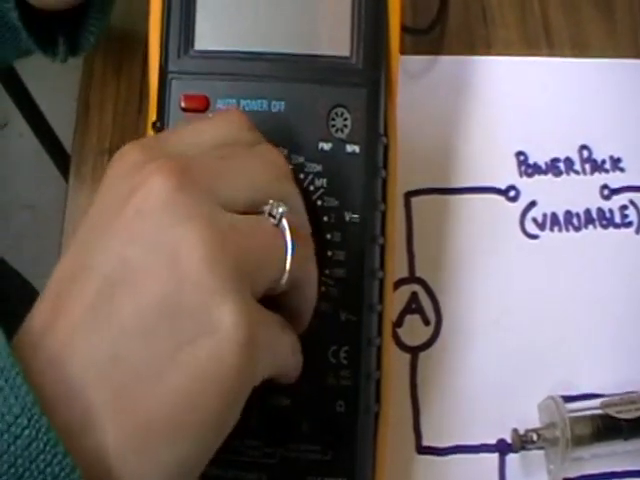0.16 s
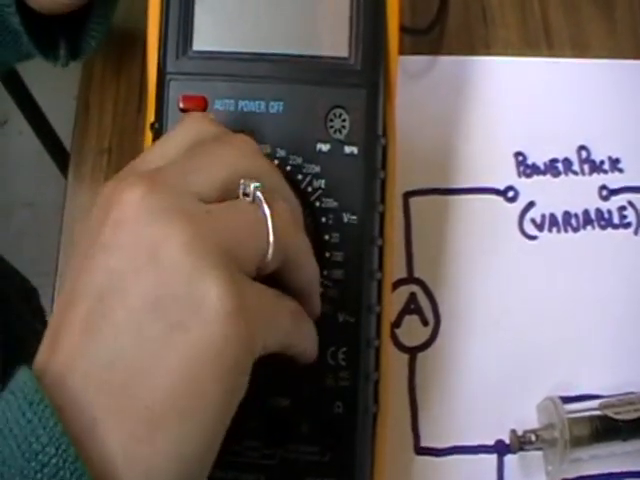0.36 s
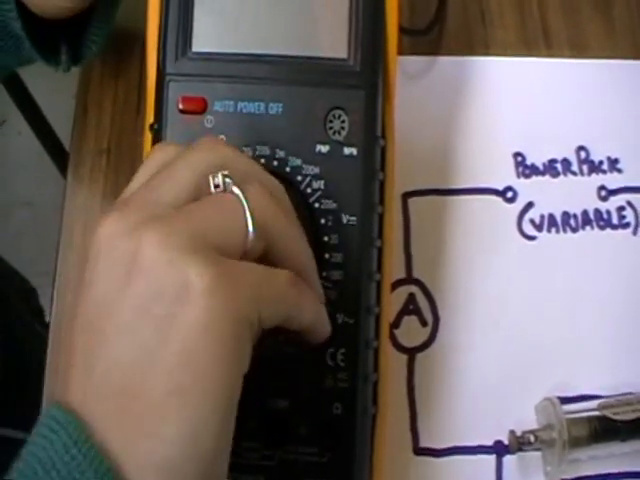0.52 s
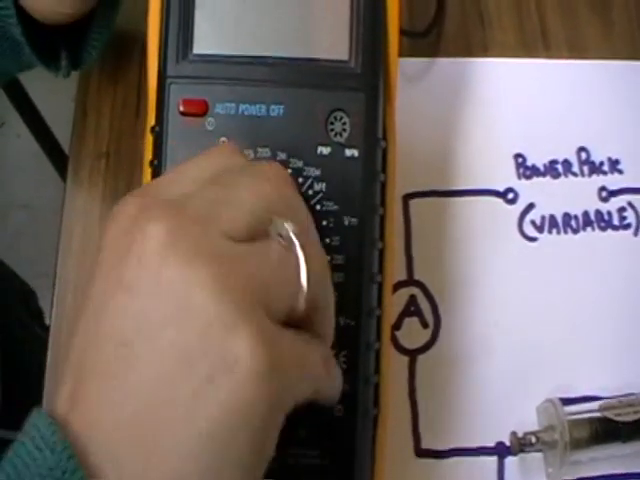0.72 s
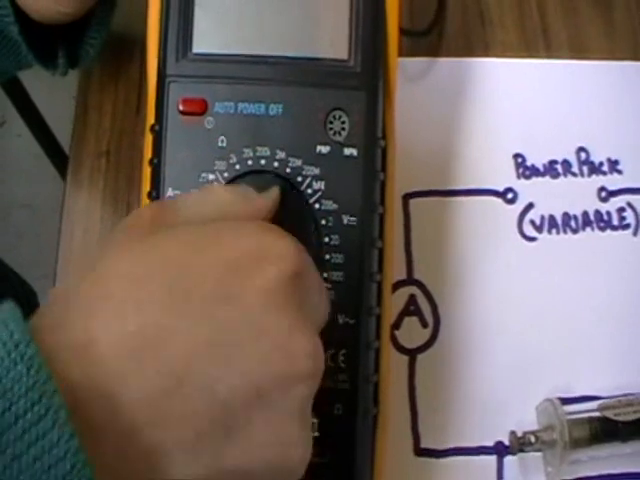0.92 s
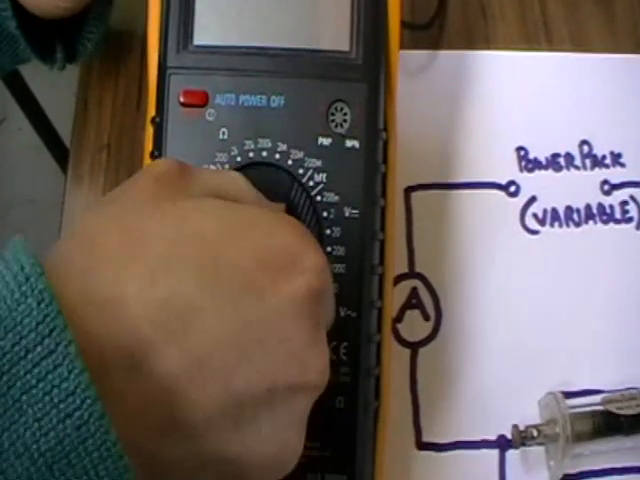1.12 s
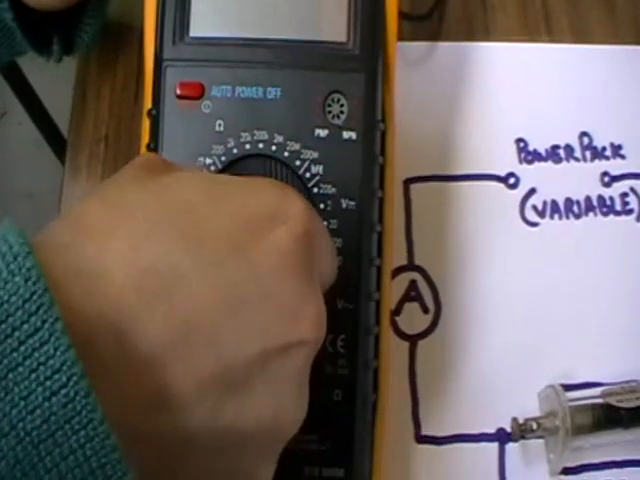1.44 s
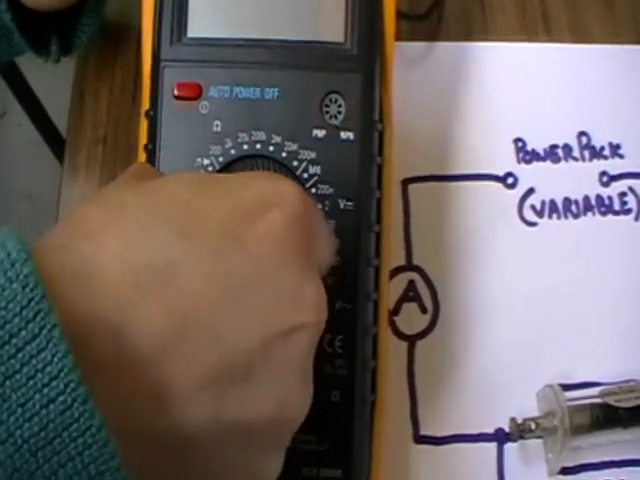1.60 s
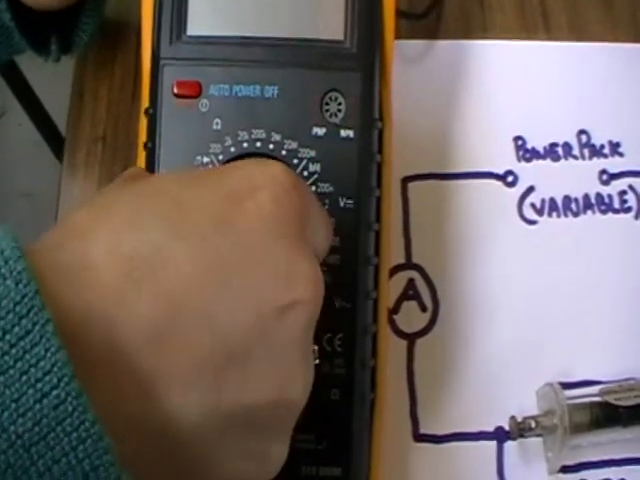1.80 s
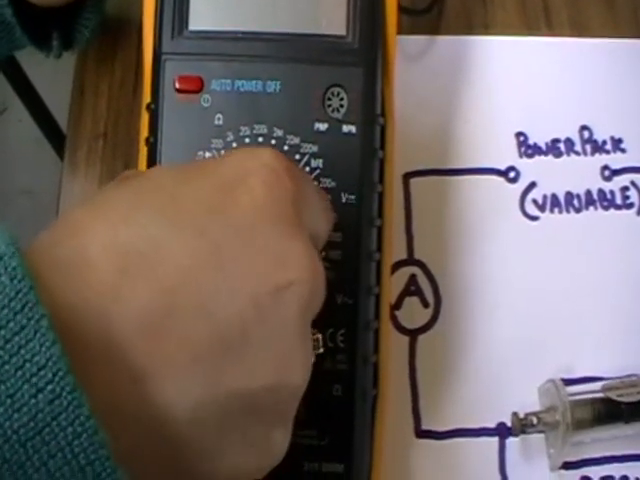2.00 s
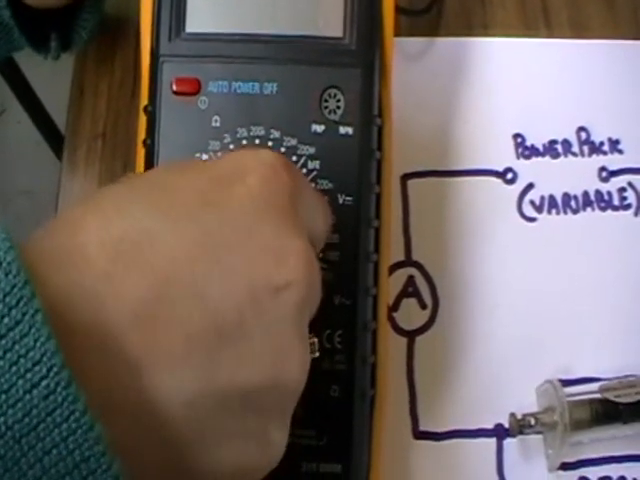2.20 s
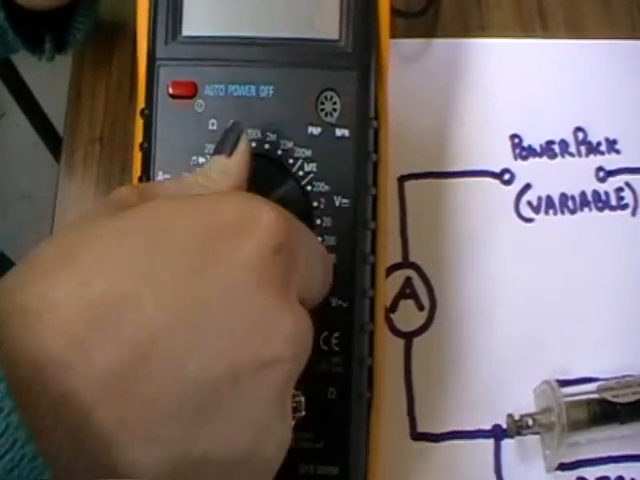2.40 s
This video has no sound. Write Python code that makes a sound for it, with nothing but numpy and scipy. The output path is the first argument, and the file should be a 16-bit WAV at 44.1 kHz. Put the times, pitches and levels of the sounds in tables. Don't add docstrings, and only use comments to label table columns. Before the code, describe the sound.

Hard clicks of a meter's dial turned by hand, with finger ticks and a brief scrape

```python
import sys
import numpy as np
from scipy import signal
from scipy.fft import rfft, irfft
from scipy.io import wavfile
from scipy.ndimage import uniform_filter1d

SR = 44100
rng = np.random.default_rng(int(sys.argv[2]) if len(sys.argv) > 2 else 0)


def wrap_up_sound(samples):
    columns = np.atleast_2d(samples).T
    tamed = np.clip(columns, -1, 1)
    steps = np.round(tamed * 32767).astype(np.int16)
    wavfile.write(sys.argv[1], SR, steps)


def ratio(d):
    e = np.asarray(d, float) / 20
    return 10 ** e


N = 112454

# f/Hz, level/dB
AIR_TONE = [(25, -29.5), (60, -13.5), (130, -10), (273, -7.5), (380, -12.5), (1400, -20.5), (5570, -30.5),
            (16500, -48.5)]
# f/Hz, level/dB
AIR_SIDE_TONE = [(50, -9), (200, -16), (2000, -10), (12000, 1.5)]
# f/Hz, width/Hz, level/dB
HUMS = [(277.8, 26, -57.5), (140.7, 8.3, -64), (509, 42, -72.5)]
# f/Hz, level/dB, time to fade by 60 dB/s
METAL_RING = [(5500, -68, .45), (10550, -72, .45)]
# f/Hz, level/dB, time to fade by 60 dB/s
ROOM_BANDS = [(250, -18.5, 0.73), (713.5, -15, .45), (1400, -19.5, 0.48), (3000, -20.5, 0.36),
              (5500, -43, 1), (9640, -38.5, 1), (14100, -27, 0.57)]
# f/Hz, difference/dB
LEFT_LEAN = [(300, 0), (1500, 2), (3000, 0.5), (5500, -1.9), (9000, -2.3), (13000, -7)]
# f/Hz, level/dB
PORT_SCATTER = [(300, -2.5), (2000, -6), (5500, -19), (9000, -9.5), (14000, -9)]
# t/s, level/dB, f/Hz, time to fade by 60 dB/s
DESK_THUDS = [(.2021, -32.5, 155, 0.056), (0.2392, -30, 146.6, 0.13), (0.4354, -30, 242, 0.033),
              (0.4594, -31, 177, 0.12), (0.6106, -40.5, 139, 0.14), (0.786, -33, 782, 0.027),
              (0.7867, -37.5, 409, 0.051), (.8141, -39, 724, .031), (0.9177, -41, 740, .041),
              (1.0207, -26, 750, 0.022), (1.0211, -38.5, 533, 0.015), (1.1146, -31, 131, 0.081),
              (1.1151, -27.5, 750, 0.028), (1.1154, -29.5, 318, 0.047), (1.3255, -30.5, 157.2, .11),
              (1.4739, -32.5, 146.6, 0.088), (1.5049, -35.5, 129, 0.1), (1.6011, -32, 584, 0.044),
              (1.601, -38.5, 200, 0.085), (1.7581, -35, 615, 0.018), (1.7604, -44, 133, 0.11),
              (1.7687, -36, 1050, 0.027), (2.1414, -38.5, 925, 0.035), (2.1461, -40, 883, .031),
              (2.1576, -38, 1010, 0.024), (2.4586, -18, 492, 0.029), (2.4581, -37.5, 720, 0.02),
              (2.4643, -34, 590, 0.035), (2.477, -40.5, 720, 0.033), (2.481, -38.5, 205, 0.024),
              (2.4897, -37, 505, 0.037)]
# t/s, level/dB
LIGHT_SLIDE = [
    (0.821, -68),
    (0.851, -56),
    (.89, -64),
    (.92, -48.5),
    (0.934, -60),
    (1.0, -60.5),
    (1.06, -58),
    (1.11, -64),
]
# t/s, level/dB
SCRAPE_LEVEL = [
    (1.113, -65),
    (1.117, -42),
    (1.13, -35.5),
    (1.144, -44),
    (1.156, -40.5),
    (1.168, -33.5),
    (1.178, -36),
    (1.187, -41),
    (1.205, -58),
    (1.22, -71),
]
# t/s, level/dB
SCRAPE_JERKS = [(1.1262, -31), (1.129, -27.5), (1.138, -31), (1.1412, -38.5), (1.144, -30), (1.156, -35),
                (1.162, -30.5), (1.1667, -24), (1.169, -26), (1.1712, -30.5), (1.174, -30), (1.177, -25.5),
                (1.184, -42), (1.192, -46), (1.200, -43)]
# f/Hz, width/Hz, level/dB
SCRAPE_MODES = [(750, 80, -14), (1115, 90, -20.5), (1530, 120, -3), (2270, 110, -3.5), (2880, 150, -8.5),
                (3750, 350, -10.5), (4700, 400, -17.5), (7040, 150, -24.5), (8400, 300, -21.5),
                (11000, 320, -23.5)]
# t/s, level/dB, f/Hz, time to fade by 60 dB/s
PANEL_RINGS = [(.201, -21, 1570, 0.036), (0.202, -20, 3200, 0.038), (.433, -22.5, 4460, 0.014),
               (0.588, -18.5, 1507, 0.046), (.589, -20.5, 2060, 0.041), (.609, -11.5, 4600, 0.031),
               (.786, -30, 1480, 0.037), (0.785, -35, 2300, 0.017), (0.788, -19, 4440, 0.013),
               (0.785, -30, 3200, 0.015), (1.326, -22.5, 2084, .02), (1.4745, -11.5, 7870, 0.019),
               (2.456, -36.5, 1580, 0.028), (2.4594, -21.5, 500, 0.017), (1.114, -44, 4700, 0.0059),
               (1.3256, -1.5, 5635, 0.019), (1.47, -12.5, 5650, 0.013), (1.5983, -10.5, 5630, .014),
               (1.605, -23, 2810, 0.018), (1.575, -37.5, 2020, 0.038), (1.447, -38, 2000, 0.029),
               (2.457, -28, 3650, 0.018), (1.505, -29, 1140, 0.016)]
# f/Hz, level/dB, time to fade by 60 dB/s
CASE_MODES = [(1080, -13, 0.01244), (1597, -8.5, 0.048), (2123, -13.5, 0.03), (2394, -5, 0.016),
              (2742, -14, 0.019), (3200, 3.5, 0.0043)]
# f/Hz, level/dB, time to fade by 60 dB/s
KNOB_MODES = [(3940, -24.5, 0.024), (4800, -20.5, 0.0038), (4600, -2, .008), (5060, -17, .008),
              (5786, 5, 0.015), (5950, 14.5, 0.0038), (6420, 4.5, 0.021), (7030, 15, 0.006),
              (7500, -5, 0.0034)]
# f/Hz, level/dB, time to fade by 60 dB/s
FIZZ_MODES = [(7960, 14, 0.0026), (7910, 4, 0.0024), (9060, -5, 0.0042), (9290, 9, 0.002),
              (10870, -16.5, .004), (11030, 0, 0.0049), (12100, -8, 0.0034), (13500, -27, 0.0036),
              (13900, -18, .003)]
# t/s, level/dB, rattle time/ms, case level/dB, fizz level/dB
SMALL_TICKS = [(.190, -30, 0.31, 2.5, -11), (.1975, -46, 0.94, 16, -3), (.234, -18, 1.4, -8, -6),
               (.430, -41, 1.2, 3, -8.5), (.586, -31, 4.2, 11.5, -19), (.793, -41, 3.2, 7, -16),
               (.814, -41.5, 1.3, 6, -2), (.916, -46.5, 13, 15.5, -9), (1.021, -32.5, 0.67, 6, -9),
               (1.070, -42.5, 1.9, 8, -12), (1.317, -35.5, 1.6, 12.5, -12), (1.447, -43.5, 2, 7, -14),
               (1.464, -43, 2.5, 9, -11), (1.571, -52, 2.5, 9.5, -12), (1.576, -43, 1.4, 4, -12),
               (1.762, -31, 3.3, -0.5, -16), (1.878, -52, 1.95, 10.5, -8), (2.058, -57, 9.5, 10, -3.5),
               (2.146, -28, 3, 3, -3), (2.1565, -40, 1.2, 11.5, -10), (2.486, -44.5, 2.2, 5, 0),
               (2.161, -37, 1, 2, -7), (2.419, -61, 2, -3, 7), (1.629, -45, 1.8, 10.5, -10)]
# t/s, level/dB, rattle time/ms, case level/dB, fizz level/dB
KNOB_SNAPS = [(.200, 0, 0.59, -22, -1.5), (.236, -4, 1.84, -21.5, -4), (.4322, 0, 1.37, -23.5, -1.5),
              (.4535, -4.5, 3.9, -20, -6), (.5885, -0.5, 3.5, -53, -0.5), (.609, -7.5, 2.1, -53, -0.5),
              (1.325, -3, 4.65, -23, -3), (1.469, -12, 2.24, -24, 2.5), (1.4745, -7.5, 0.71, -9, -10),
              (1.505, -23.5, 0.62, -9, -5.5), (1.5975, -10, 2.56, -28.5, -1.5),
              (1.606, -22, 1.5, -2.5, -12.5), (1.756, -25.5, 2.7, -19, 9.5), (1.7675, -30, 0.62, 5.5, -4),
              (2.1405, -22.5, 2.55, -38, 8), (.786, -20.5, 1.3, 4.5, -1), (1.114, -23, 1.4, 6.5, -9),
              (2.457, -24.5, 1.24, -3.5, -7)]

LEFT_RIGHT = np.array([[1], [-1]])


def unit(x):
    return x / np.sqrt(np.mean(x ** 2))


def cut(x, hz, kind, order=2):
    return signal.sosfilt(signal.butter(order, min(hz, .45 * SR), kind, fs=SR, output="sos"), x)


def tint(x, points):
    hz, db = np.array(points, float).T
    f = np.fft.rfftfreq(x.shape[-1], 1 / SR) + 1
    gain = ratio(np.interp(np.log(f), np.log(hz), db))
    return irfft(rfft(x) * gain, x.shape[-1])


def reso(x, hz, width):
    return signal.lfilter(*signal.iirpeak(hz, hz / width, fs=SR), x)


def decay(t, t60):
    return np.exp(-np.log(1000) * t / t60)


def walk(rate):
    k = int(SR / rate)
    steps = np.repeat(rng.standard_normal(N // k + 1), k)
    return unit(uniform_filter1d(steps, k)[:N])


def add(out, s, x):
    i = int(s * SR)
    out[i:i + len(x)] += x[:N - i]


def air():
    level_db = -55
    mid = unit(tint(rng.standard_normal(N), AIR_TONE)) * ratio(level_db + 1.0 * walk(5.1))
    side = unit(tint(rng.standard_normal(N), AIR_TONE))
    side = tint(side, AIR_SIDE_TONE) * ratio(level_db)
    hum = sum(ratio(db) * unit(reso(rng.standard_normal(N), hz, width)) for hz, width, db in HUMS)
    return mid + hum + side * LEFT_RIGHT


def metal_ring(t):
    return sum(ratio(db) * np.sin(2 * np.pi * hz * t) * decay(t, t60) for hz, db, t60 in METAL_RING)


def room(x):
    early_db, early_t60_s, side_db = -42.5, 0.048, -15.5
    t = np.arange(SR // 2) / SR
    noise = rng.standard_normal((2, len(t)))
    tail = sum(ratio(db - 34) * reso(noise, hz, 1.076 * hz) * decay(t, t60) for hz, db, t60 in ROOM_BANDS)
    tail = tail + ratio(early_db) * noise * decay(t, early_t60_s)
    tail = tail * np.minimum(t / 0.012, 1)
    mid, side = signal.fftconvolve(x[None], tail, axes=1)[:, :N]
    return mid + ratio(side_db) * side * LEFT_RIGHT


def stereo_ports(near):
    lean = np.array(LEFT_LEAN)
    direct = np.array([tint(near, lean * [1, side / 2]) for side in (1, -1)])
    scatter = np.diff(rng.standard_normal(40))
    scatter = np.convolve(near, scatter / np.linalg.norm(scatter))[:N]
    return direct + tint(scatter, PORT_SCATTER) * LEFT_RIGHT


def thuds():
    out, t = np.zeros(N), np.arange(9000) / SR
    for s, db, hz, t60 in DESK_THUDS:
        tones = sum(np.sin(2 * np.pi * hz * k * t) for k in (.75, .9, 1.1, 1.35))
        rise = np.minimum(t * hz, 1)
        add(out, s, ratio(db - 2.0) * tones * decay(t, t60) * rise)
    return cut(out, 99.7, "high")


def level_over(t, points):
    return ratio(np.interp(t, *np.array(points).T, left=-120, right=-120))


def slide(t):
    hz, width_hz = 3000, 9700
    whisper = reso(rng.standard_normal(N), hz, width_hz)
    return unit(cut(whisper, 2 * hz, "low")) * level_over(t, LIGHT_SLIDE)


def scrape(t):
    rough_db, top_hz = 0, 12500
    grains = rng.standard_normal(N) * ratio(rough_db * walk(400))
    grains = unit(cut(grains, top_hz, "low", order=6)) * level_over(t, SCRAPE_LEVEL)
    for s, db in SCRAPE_JERKS:
        add(grains, s, ratio(db + 15) * cut(np.hanning(5), top_hz, "low"))
    body = np.zeros(N)
    for hz, width, db in SCRAPE_MODES:
        even = np.sqrt(SR / width / 20)
        body += ratio(db + 4.5) * even * reso(reso(grains, hz, 2 * width), hz, 4 * width)
    rub = cut(reso(grains, 2530, 4100), 600, "high")
    return body + ratio(-14) * rub


def panels():
    out, t = np.zeros(N), np.arange(4000) / SR
    for s, db, hz, t60 in PANEL_RINGS:
        rise = np.minimum(t / .0006, 1)
        add(out, s, ratio(db) * np.sin(2 * np.pi * hz * t) * decay(t, t60) * rise)
    return out


def ring(modes, chance, t):
    scatter_db, detune, longest_t60_s = 2, .02, .016
    hz, db, t60 = np.array(modes, float).T[:, :, None]
    size, pitch = chance[:len(modes)].T[:, :, None]
    tones = np.sin(2 * np.pi * hz * (1 + detune * pitch) * t)
    fade = decay(t, np.minimum(t60, longest_t60_s))
    return np.sum(ratio(db + scatter_db * size) * fade * tones, axis=0)


def contacts(rattle, ms):
    rise_ms, fall_ms, sag_db, scatter_db = .25, 1, 2, 5
    settle_db, settle_ms, settle_rough_db, settle_top_hz = -11, 4.2, 2.5, 7000
    hits, sizes, wander, loose = rng.standard_normal((4, len(ms)))

    shape = np.minimum(ms / rise_ms, 1) * ratio(-sag_db * ms / rattle)
    shape = shape * np.exp(-np.maximum(ms - rattle, 0) / fall_ms)
    spectrum = rfft(shape * hits * ratio(scatter_db * sizes))
    run = irfft(spectrum / np.sqrt(uniform_filter1d(np.abs(spectrum) ** 2, size=40)))

    rough = settle_rough_db * unit(uniform_filter1d(wander, size=60))
    chatter = ratio(settle_db + rough) * np.exp(-ms / settle_ms) * cut(loose, settle_top_hz, "low")
    return run / np.abs(run).max() * 4 + chatter


def plastic_strike(db, case_db, fizz_db, t):
    knob_top_hz, case_top_hz, thin_hz = 9700, 4170, 1400
    hard_hz, softer_per_db = 18400, 0.01
    body_db, body_hz, body_t60_s = -26.5, 414, 0.11
    chance = rng.standard_normal((3, 9, 2))
    knob = cut(ring(KNOB_MODES, chance[0], t), knob_top_hz, "low")
    case = cut(ring(CASE_MODES, chance[1], t), case_top_hz, "low")
    fizz = ring(FIZZ_MODES, chance[2], t)
    strike = unit(knob) + ratio(case_db) * unit(case) + ratio(fizz_db) * unit(fizz)
    strike = ratio(db - 17.5) * strike
    strike = cut(strike, hard_hz * ratio(softer_per_db * db), "low", order=3)
    strike = cut(strike, thin_hz, "high", order=4)
    knock = reso(rng.standard_normal(len(t)), body_hz, body_hz) * decay(t, body_t60_s)
    return strike + ratio(db + body_db - 16.5) * unit(knock)


def clicks(rows):
    near, far, t = np.zeros(N), np.zeros(N), np.arange(2048) / SR
    for s, db, rattle, case_db, fizz_db in rows:
        touch = contacts(rattle, 1000 * t)
        strike = plastic_strike(db, case_db, fizz_db, t)
        add(near, s, signal.fftconvolve(touch[:1900] / np.linalg.norm(touch), strike))
        blend = irfft(np.sqrt(uniform_filter1d(np.abs(rfft(strike)) ** 2, size=30)))
        add(far, s, np.roll(blend, 128)[:256] * np.hanning(256))
    return np.array([near, far])


def scene():
    t = np.arange(N) / SR
    near, far = clicks(KNOB_SNAPS) + clicks(SMALL_TICKS) + thuds()
    rub = scrape(t) + slide(t)
    near = near + panels() + rub
    far = far + ratio(-1) * rub
    return stereo_ports(near) + room(far) + air() + metal_ring(t)


def top_cut(x):
    return signal.sosfilt(signal.butter(12, 16950, fs=SR, output="sos"), x)


def record(dry):
    ceiling, top_hz, mic_low_hz = .8, 16300, 45
    x = ceiling * np.tanh(dry / ceiling)
    x = signal.sosfilt(signal.ellip(8, .2, 70, top_hz, fs=SR, output="sos"), x)
    x = cut(x, mic_low_hz, "high")
    return top_cut(x)


dry = scene()
out = record(dry)
wrap_up_sound(out)
```